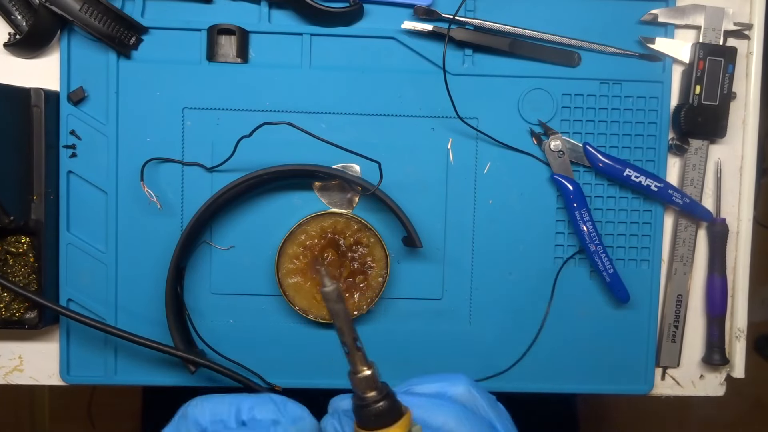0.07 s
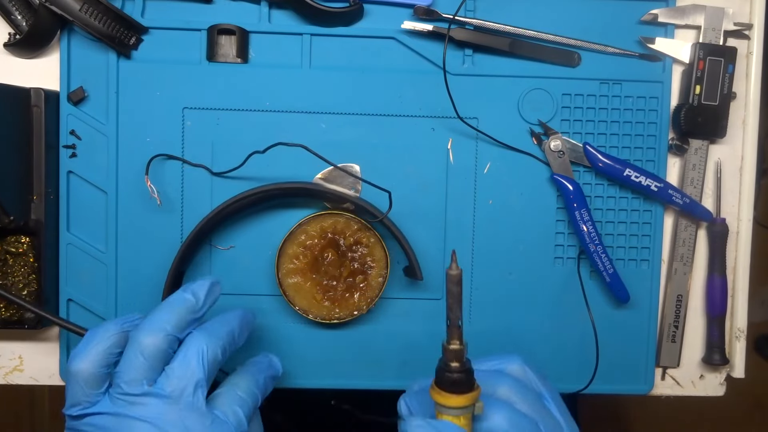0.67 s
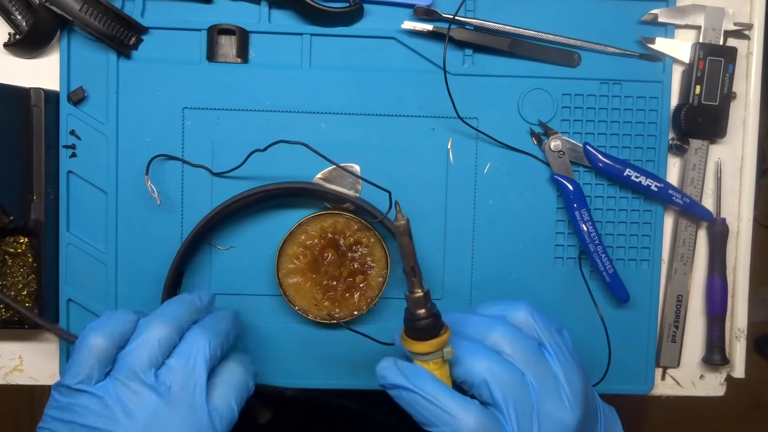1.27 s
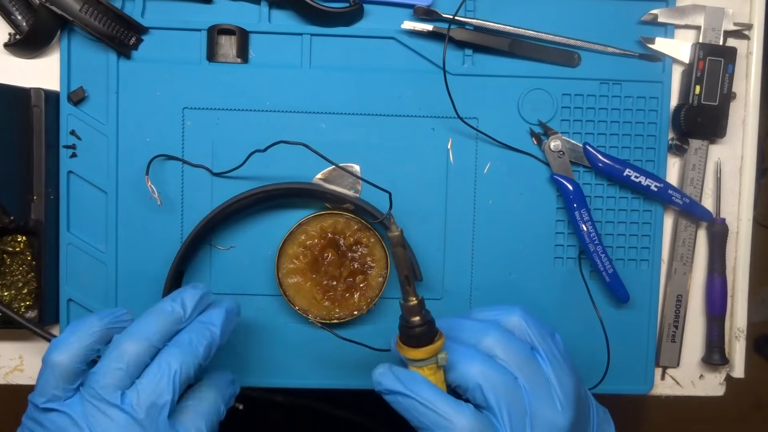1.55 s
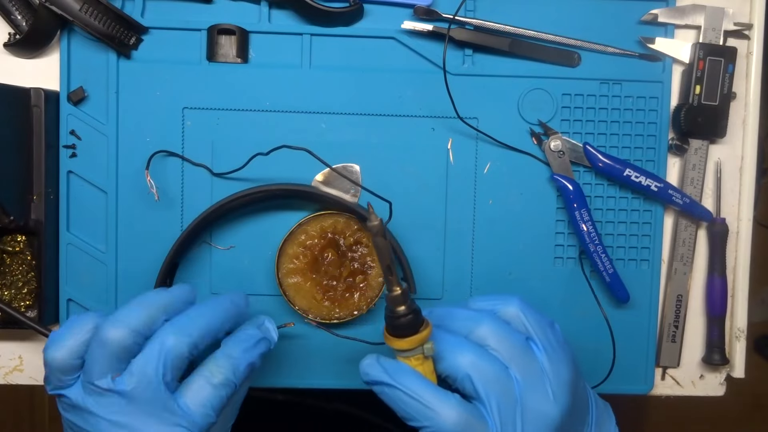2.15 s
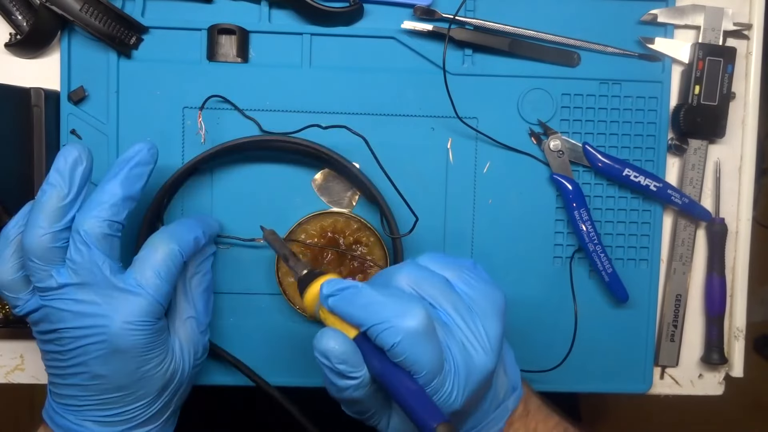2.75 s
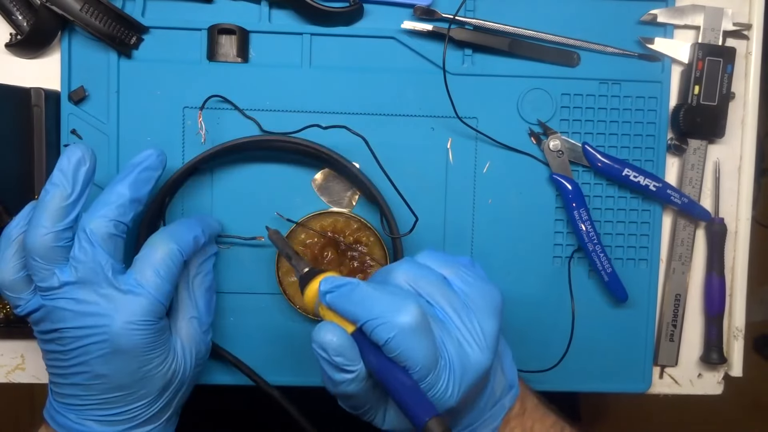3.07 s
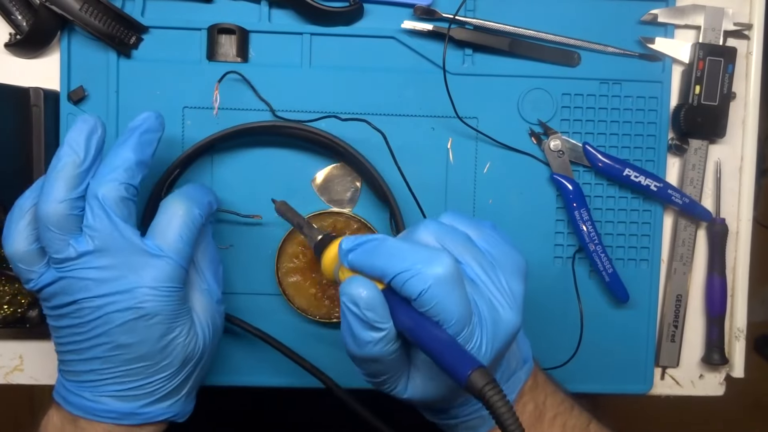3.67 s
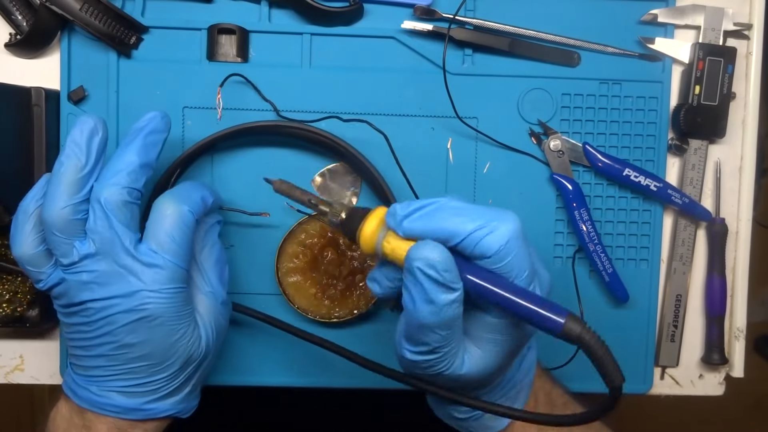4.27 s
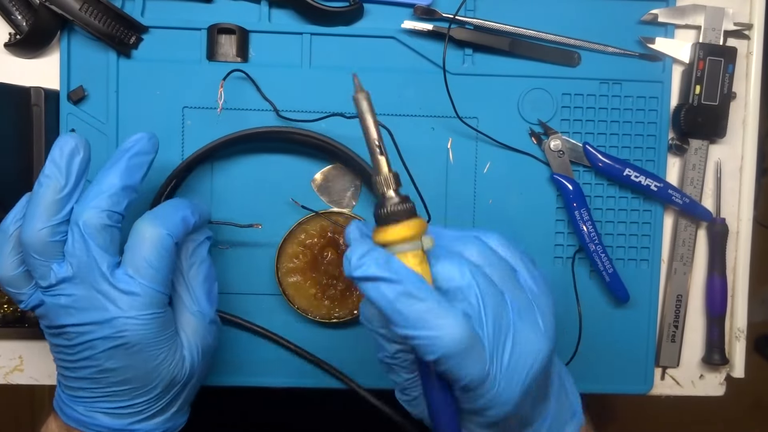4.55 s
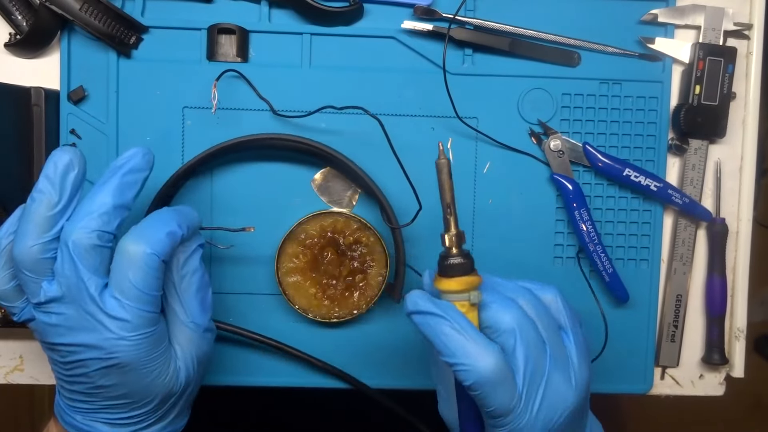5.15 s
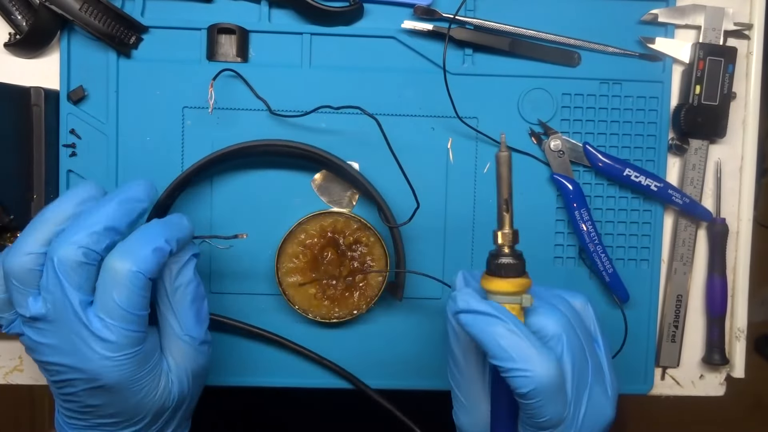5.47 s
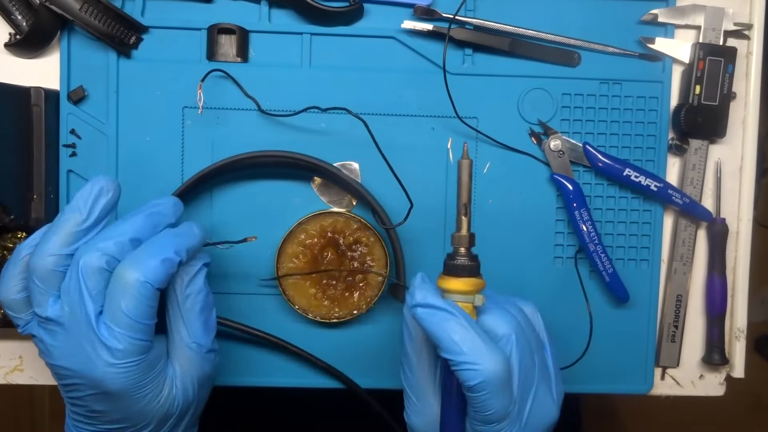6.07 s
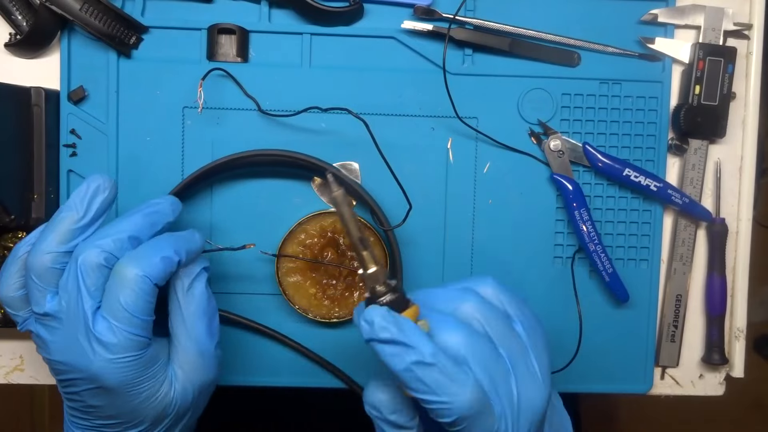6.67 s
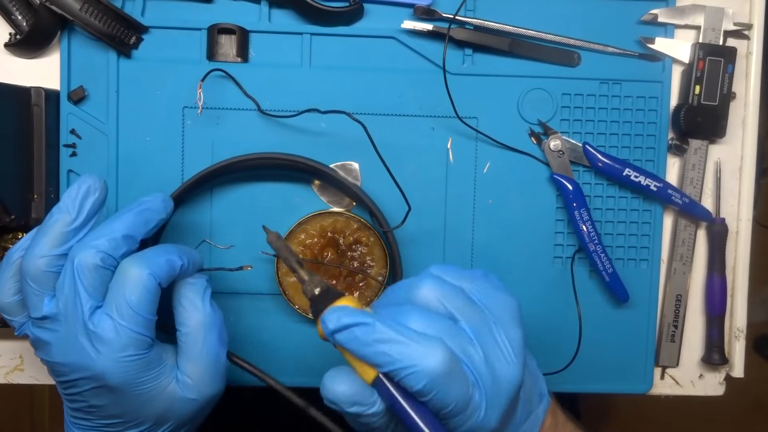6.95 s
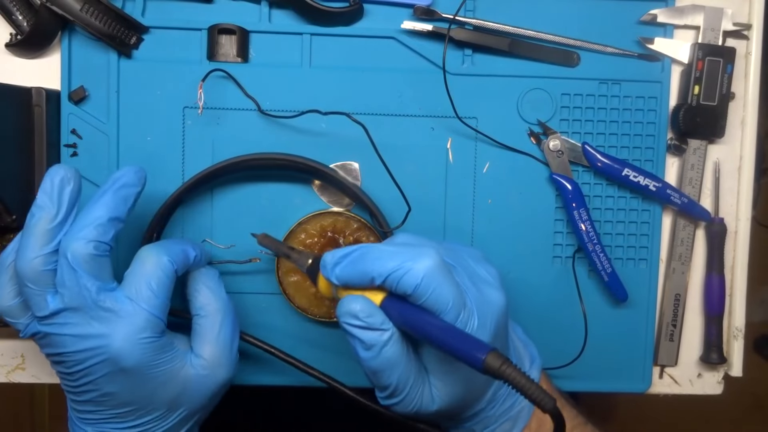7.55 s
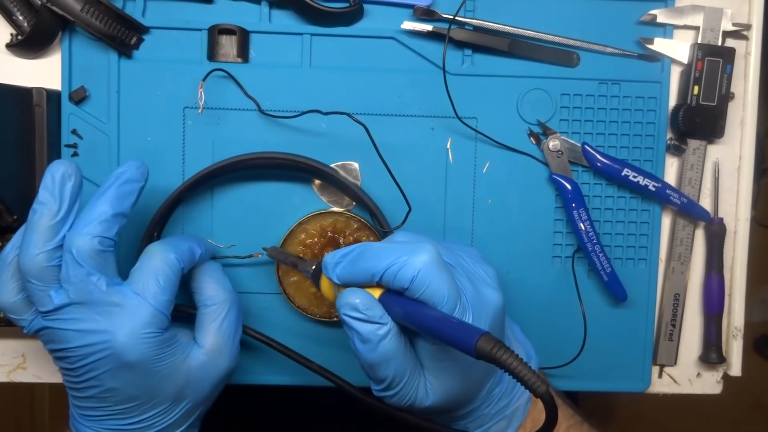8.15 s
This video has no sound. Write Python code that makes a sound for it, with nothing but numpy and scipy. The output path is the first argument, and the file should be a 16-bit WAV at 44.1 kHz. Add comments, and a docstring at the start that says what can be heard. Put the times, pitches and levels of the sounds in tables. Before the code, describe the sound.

Close, quiet soldering work in a small room, over faint hum and microphone hiss. Gloves rub and tick on the iron's handle from the start, while a headband and cable scuff and judder dully over a silicone mat throughout. Soft bumps with small chirps come around 0.5 seconds, and a low ringing thump at 1.5. Near 2 seconds the rubbing grows stronger, with a thin glove whistle. A firm knock at 2.7 briefly rings the bench top and flux tin, followed by lighter knocks until about 4.3. Flux sizzles very faintly at about 3.2 and 3.9. From 4.3 to 6.8 there are mostly glove rubs, sharp little ticks and mat drags, with a short chirp near 4.9. Another firm knock lands at 7 seconds, then two more at 7.4 and 7.9, a trace of sizzle, and a brighter tap at 8.1.

```python
"""Knocks and soft bumps ring a bench top and a flux tin during soldering, some with a low ring or thump.
Gloves rub, tick, chirp and whistle as they slip on the iron's handle. A headband and cable drag and
judder over a silicone mat, and flux sizzles faintly on the hot tip.
A small room answers; its air, a faint hum and microphone hiss lie underneath."""
import sys
import numpy as np
from scipy import signal
from scipy.fft import rfft, irfft, next_fast_len
from scipy.io import wavfile
from scipy.ndimage import uniform_filter1d, map_coordinates

SR = 44100
rng = np.random.default_rng(int(sys.argv[2]) if len(sys.argv) > 2 else 0)


def waveform_to_disk(signal):
    """Save audio, clipped to [-1, 1], as 16-bit WAV at the path in sys.argv[1]."""
    frames = np.transpose(np.atleast_2d(signal))
    scaled = np.clip(frames, -1, 1) * 32767
    samples = np.round(scaled).astype(np.int16)
    wavfile.write(sys.argv[1], SR, samples)


N = 366030


def amp(db):
    """Decibels to gain."""
    return 10 ** (np.asarray(db) / 20)


def unit(x):
    """Scale to rms 1."""
    return x / np.sqrt(np.mean(x ** 2) + 1e-20)


def along(points, hz):
    """Read (freq_hz, value) points on a log axis."""
    freqs_hz, values = np.transpose(points)
    return np.interp(np.log(hz + 1), np.log(freqs_hz + 1), values)


def wobble(rate_hz):
    """Smooth random curve, rate_hz knots a second."""
    knots = rng.standard_normal(int(N * rate_hz / SR) + 4)
    return map_coordinates(knots, [np.arange(N) * rate_hz / SR])


def filtered(x, response):
    """Zero-phase filter with gain response(hz)."""
    n = x.shape[-1]
    size = next_fast_len(n + SR // 4)
    return irfft(rfft(x, size) * response(np.fft.rfftfreq(size, 1 / SR)), size)[..., :n]


def coloured(x, points, size=4096):
    """Minimum-phase filter from (freq_hz, gain_db) points: nothing sounds before an attack."""
    gain = amp(along(points, np.fft.rfftfreq(size, 1 / SR)))
    cepstrum = irfft(np.log(gain))
    cepstrum[1:size // 2] *= 2
    cepstrum[size // 2 + 1:] = 0
    impulse = irfft(np.exp(rfft(cepstrum)))
    return signal.fftconvolve(x, impulse[None], axes=1)[:, :x.shape[1]]


def add(track, start_s, sound):
    """Mix a sound into the track."""
    part = track[:, max(round(start_s * SR), 0):][:, :sound.shape[-1]]
    part += sound[..., :part.shape[1]]


# Stereo width of near sounds: freq_hz, side_over_mid_db
NEAR_WIDTH = [(100, -38), (400, -9), (1000, -11), (4000, -13), (14000, -14)]

def stereo_noise(n, width=NEAR_WIDTH):
    """White noise on two close microphones."""
    mid, side = rng.standard_normal((2, n))
    side = filtered(side, lambda hz: amp(along(width, hz)))
    return np.array([mid + side, mid - side])


def dying_noise(t60s, width, size=128):
    """Half a second of stereo noise, each frequency decaying at its own rate."""
    hz, t, spectrum = signal.stft(stereo_noise(SR // 2, width), SR, nperseg=size)
    decay = amp(-60 * t / along(t60s, hz)[:, None])
    return signal.istft(spectrum * decay, SR, nperseg=size)[1][:, :SR // 2]


def patchy(x, depth_db, size=1024):
    """Moving hands shift the reflections: peaks and dips drift through the spectrum."""
    spectrum = signal.stft(x, nperseg=size)[2]
    field = uniform_filter1d(rng.standard_normal(spectrum.shape[1:]), size=5, axis=0)
    field = uniform_filter1d(field, size=9, axis=1)
    return signal.istft(spectrum * amp(depth_db * unit(field)), nperseg=size)[1][:, :x.shape[1]]


def friction(tone, grain_db, grain_hz):
    """Countless tiny slips of uneven size, coloured by the surface."""
    slips = stereo_noise(N) * amp(grain_db * wobble(grain_hz))
    return unit(coloured(slips, tone))


def stroke(peak_s, length_s, release_ratio=1.21, roundness=1.17):
    """A hand speeds up until peak_s, then slows a little more gently."""
    offset = 2 * (np.arange(N) / SR - peak_s) / length_s
    return np.exp(-np.maximum(-offset, offset / release_ratio) ** roundness)


# Room decay: freq_hz, t60_s
ROOM_DECAY = [(120, 0.86), (500, 0.26), (2000, 0.56), (5000, 0.5), (12000, 0.063)]
# Room stereo width: freq_hz, side_over_mid_db
ROOM_SPREAD = [(60, -25), (200, -10), (700, -3), (2400, -6), (8000, -11)]

def in_room(x, wet_db, build_s=0.0016):
    """Direct sound plus a diffuse small-room tail."""
    t = np.arange(SR // 2) / SR
    tail = dying_noise(ROOM_DECAY, ROOM_SPREAD) * (1 - np.exp(-t / build_s))
    tail /= np.linalg.norm(tail[0])
    return x + amp(wet_db) * signal.fftconvolve(x, tail, axes=1)[:, :x.shape[1]]


# Air and hiss spectrum: freq_hz, gain_db
AIR_SPECTRUM = [(20, -20), (70, -4.5), (113, -5.5), (246, -8.5), (334, -12.5), (634, -19), (1000, -18),
                (1420, -19.5), (2350, -23.5), (4300, -29.5), (5500, -27), (9000, -31), (15600, -34.5)]
# Room hum: pitch_hz, rms_db
HUM_TONES = [(80.7, -73.5), (199.5, -73)]

def room_air(air_db=-60.5):
    """Air noise and microphone hiss, with a slightly unsteady hum."""
    t = np.arange(N) / SR
    hum = sum(np.sqrt(2) * amp(rms_db) * np.sin(2 * np.pi * pitch_hz * t + 0.64 * wobble(3.2))
              for pitch_hz, rms_db in HUM_TONES)
    air = coloured(stereo_noise(N, ROOM_SPREAD), AIR_SPECTRUM)
    return amp(air_db) * unit(patchy(air, depth_db=2.0)) + hum


# Rub and sizzle spectrum: freq_hz, gain_db
HISS_SPECTRUM = [(400, -31), (1000, -6.5), (1850, -1), (2150, -0.5), (2700, 3), (4800, -2.5), (6600, 0),
                 (9400, -4), (10200, 0.5), (11400, -3), (12600, -12.5), (15500, -16)]
# Glove and cable strokes: peak_s, length_s, level_db, tilt_db (added to treble, taken from bass)
RUBS = [(0.027, 0.24, -62.5, 5.5), (0.244, 0.059, -53.5, 6), (0.472, 0.19, -59, -1),
        (0.621, 0.033, -63, 7.5), (1.012, 0.25, -65.5, -0.5), (1.235, 0.12, -58, -2),
        (1.524, 0.28, -63, -2), (1.724, 0.11, -57, -1.5), (1.844, 0.076, -52.5, 5.5),
        (1.975, 0.099, -50, 2.5), (2.103, 0.063, -48.7, 3), (2.212, 0.2, -63, -3),
        (2.333, 0.042, -56, -1.5), (2.522, 0.013, -60, -9), (4.345, 0.13, -57.5, 1.5), (4.53, 0.2, -58, 2),
        (5.03, 0.021, -59.5, -6), (5.381, 0.035, -55.5, -6.5), (5.545, 0.37, -68.5, 2.5),
        (6.578, 0.04, -55, 11.5), (6.658, 0.061, -57.5, 10.5), (6.782, 0.28, -57.5, 0)]

def rub_and_sizzle(resting_db=-75, split_hz=5500):
    """Sliding gloves and cable share one hiss with the flux; each stroke has its level and brightness."""
    gestures = [(amp(level_db) * stroke(peak_s, length_s), tilt_db)
                for peak_s, length_s, level_db, tilt_db in RUBS]
    gestures += flux_boils()
    hiss = patchy(friction(HISS_SPECTRUM, grain_db=2, grain_hz=450), depth_db=3.0)
    hiss *= amp(wobble(22))  # spurts
    treble = filtered(hiss, lambda hz: hz ** 2 / (hz ** 2 + split_hz ** 2))
    resting_power = amp(resting_db) ** 2  # gloves never lie quite still
    treble_power = resting_power + sum((gain * amp(tilt_db)) ** 2 for gain, tilt_db in gestures)
    bass_power = resting_power + sum((gain * amp(-tilt_db)) ** 2 for gain, tilt_db in gestures)
    return treble * np.sqrt(treble_power) + (hiss - treble) * np.sqrt(bass_power)


# Tick spectrum: freq_hz, gain_db
TICK_SPECTRUM = [(500, -5.5), (1500, -1), (2800, 2.5), (6000, 0.5), (10500, -2.5), (13000, -12),
                 (16000, -42)]
# Glove, cable and wire ticks: start_s, level_db (before trim_db), t60_s
TICK_EVENTS = [(0.027, -36, 0.049), (0.2763, -45, 0.025), (0.4473, -34.5, 0.03), (0.4717, -35, 0.049),
               (1.4238, -43, 0.024), (1.4498, -44, 0.015), (1.479, -41, 0.04), (1.4962, -43.5, 0.042),
               (1.677, -44.5, 0.073), (2.5177, -56, 0.017), (2.733, -41.5, 0.035), (3.132, -44.5, 0.017),
               (3.341, -49, 0.031), (3.725, -49.5, 0.13), (4.425, -44, 0.061), (4.6468, -47.5, 0.035),
               (4.941, -38.5, 0.045), (5.4233, -42, 0.037), (5.436, -36.5, 0.031), (6.181, -45, 0.04),
               (6.8132, -39, 0.057), (8.0956, -45.5, 0.045)]

def ticks(trim_db=-8, rise_s=0.00014):
    """A slipping glove or springing wire lets go in a tiny bright burst."""
    track, t = np.zeros((2, N)), np.arange(SR // 8) / SR
    attack = 1 - np.exp(-t / rise_s)
    for start_s, level_db, t60_s in TICK_EVENTS:
        burst = unit(coloured(stereo_noise(len(t)), TICK_SPECTRUM))
        add(track, start_s, burst * attack * amp(level_db + trim_db - 60 * t / t60_s))
    return in_room(patchy(track, depth_db=2.5), wet_db=-20)


# Mat scuff spectrum: freq_hz, gain_db
SCUFF_SPECTRUM = [(40, -9), (80, -26), (150, 2), (250, 2.5), (300, -8), (355, 2.5), (450, -7), (900, -7),
                  (1500, -15), (2500, -18), (4000, -34), (8000, -65)]
# Drags on the mat: peak_s, length_s, level_db
MAT_DRAGS = [(0.255, 0.044, -57.5), (0.56, 0.18, -57), (0.928, 0.089, -58.5), (1.51, 0.077, -53.5),
             (1.756, 0.38, -58), (2.02, 0.25, -54.5), (2.33, 0.04, -56.5), (2.521, 0.03, -54),
             (3.307, 0.26, -55), (4.02, 0.53, -57), (4.27, 0.08, -55.5), (4.53, 0.1, -61),
             (4.902, 0.052, -57.5), (5.438, 0.14, -55.5), (5.597, 0.5, -62.5), (6.81, 0.38, -61.5),
             (7.15, 0.94, -64), (8.12, 0.15, -59.5)]

def mat_drags(resting_db=-69, judder_hz=330, bandwidth_hz=166, judder_equal_db=-53.5):
    """The mat passes a dull scuff to the bench; the firmer the drag, the more the rubber judders."""
    power = sum((amp(level_db) * stroke(peak_s, length_s)) ** 2
                for peak_s, length_s, level_db in MAT_DRAGS)
    drag = np.sqrt(amp(resting_db) ** 2 + power)  # hands lean on the mat throughout
    band = filtered(stereo_noise(N), lambda hz: 1 / (1 + (2 * (hz - judder_hz) / bandwidth_hz) ** 4))
    judder = unit(band) * drag / amp(judder_equal_db)
    scuff = friction(SCUFF_SPECTRUM, grain_db=2.24, grain_hz=90)
    return drag * (scuff + judder)


# Knock bands: edge_hz
BAND_EDGES_HZ = [90, 300, 700, 1400, 2500, 6000]
# Balance of an ordinary knock: freq_hz, band_db
KNOCK_BALANCE = [(165, -5.5), (460, -1), (990, -0.5), (1870, -2.7), (3870, -15)]

def voiced(blow, strength_db, hardness_db_per_oct, ordinary_db=-36.5, brightening_per_oct=0.24):
    """Set a knock's band levels in its first 30 ms; firmer contacts are shorter, so brighter."""
    count = round(0.03 * SR)
    edges_hz = np.array(BAND_EDGES_HZ)
    centres_hz = np.sqrt(edges_hz[1:] * edges_hz[:-1])
    octaves = np.log2(centres_hz / 1000)
    tilt_db_per_oct = brightening_per_oct * (strength_db - ordinary_db) + hardness_db_per_oct
    goal_db = strength_db + along(KNOCK_BALANCE, centres_hz) + tilt_db_per_oct * octaves
    for _ in range(2):
        power = 2 * np.abs(rfft(blow.mean(0)[:count], SR)) ** 2 / (SR * count)  # 1 Hz bins
        band_db = 10 * np.log10(np.add.reduceat(power, edges_hz)[:-1])
        blow = coloured(blow, list(zip(centres_hz, goal_db - band_db)))
    return blow


# Modes of bench and tin: freq_hz, middle_hit_db, rim_hit_db
MODES = [(68, -21, -10.5), (139.7, -10.5, -5.5), (184, -17, -20), (249.8, -9, -11.5), (343.3, -9, -7.5),
         (403, -6, -7.5), (431, -5.5, -6.5), (474, 2, -7.5), (576, -26, 0), (645, -7, -2), (798, -17, 6),
         (933, 2, 5), (1039, -8.5, 14), (1164, 4, -11), (1240, -10, -4), (1297, -1, -3), (1404, -19, -1.5),
         (1565, 0, -3), (1830, 1.5, -13), (2020, 8, -3), (2720, -12, -3.5), (4060, -13, -25)]
# Mode decay: freq_hz, t60_s
MODE_DECAY = [(140, 0.18), (345, 0.22), (480, 0.12), (1000, 0.063), (1560, 0.074), (2000, 0.015),
              (3900, 0.0083)]
# Dense ringing between the modes: freq_hz, gain_db
CLATTER_SPECTRUM = [(30, -28), (70, 4), (130, -2.5), (450, -6), (1100, 7), (2000, -3), (2700, -15),
                    (4000, -28), (6000, -37.5), (11000, -45), (16000, -81)]
# Clatter decay: freq_hz, t60_s
CLATTER_DECAY = [(150, 0.35), (500, 0.32), (1200, 0.045), (2500, 0.074), (6000, 0.061)]
# Clatter stereo width: freq_hz, side_over_mid_db
CLATTER_SPREAD = [(100, -38), (700, -11.5), (4000, -12.5)]
# Knocks and soft bumps on the bench: start_s, strength_db, hardness_db_per_oct, place (0 middle, 1 rim)
BENCH_KNOCKS = [(0.456, -54, 2, 0.96), (0.513, -53.5, -0.4, 0.093), (0.672, -68.5, 0.5, 0.9),
                (1.449, -46, 3.7, 1), (2.436, -67, 1.6, 0.53), (2.7034, -33, 0.3, 0.13),
                (2.834, -41.5, 0.4, 0.55), (3.207, -43, 0.8, 1), (3.74, -41, 0.9, 0.64),
                (3.899, -49, 0.5, 1), (4.14, -46.5, 0.2, 0.94), (4.241, -48, 0, 0.81), (4.423, -56, 0, 0.7),
                (5.501, -64.5, 0, 0.88), (6.781, -69.5, 0, 0.72), (7.0434, -31.5, 0.3, 0.17),
                (7.418, -35.5, -0.1, 0.78), (7.933, -37, 0.2, 0.96), (8.094, -44.5, 9.5, 0.62)]

def bench_knocks(clatter_db=-7, clatter_rise_s=0.0008, scatter_db=4.5, detune=0.0043,
                 yield_s=0.0012, seat_s=0.0039, seat_width_s=0.00061):
    """Each contact rings the modes of bench and tin according to its place, over a brief clatter."""
    track, t = np.zeros((2, N)), np.arange(SR // 2) / SR
    mode_hz, middle_db, rim_db = np.transpose(MODES)[:, :, None]
    signs = (-1) ** np.arange(len(MODES))[:, None]  # neighbouring modes start opposed
    decay = signs * amp(-60 * t / along(MODE_DECAY, mode_hz))
    # the contact yields, then seats on the bench
    seating = 1 + 0.21 * np.exp(-((t - seat_s) / seat_width_s) ** 2)
    swell = (1 - np.exp(-t / yield_s)) * seating
    for start_s, strength_db, hardness_db_per_oct, place in BENCH_KNOCKS:
        scatter, shift = rng.standard_normal((2, len(MODES), 1))
        mode_db = middle_db + place * (rim_db - middle_db) + scatter_db * scatter
        ring = (amp(mode_db) * decay * np.sin(2 * np.pi * mode_hz * (1 + detune * shift) * t)).sum(0)
        clatter = dying_noise(CLATTER_DECAY, CLATTER_SPREAD) * (1 - np.exp(-t / clatter_rise_s))
        clatter = coloured(clatter, CLATTER_SPECTRUM)
        blow = swell * (unit(ring) + amp(clatter_db) * unit(clatter))
        blow = coloured(blow, [(25, 2), (60, -16), (120, 1.5)])  # a small board radiates little bass
        add(track, start_s, voiced(in_room(blow, wet_db=-22.5), strength_db, hardness_db_per_oct))
    return track * amp([[0.35], [-0.35]])  # slightly left


# Short pitched tones: start_s, peak_db, pitch_hz, length_s
SHORT_TONES = [(0.457, -38.5, 357, 0.02), (.514, -37.5, 866, 0.036), (.515, -42.5, 570, 0.031),
               (0.55, -58, 890, 0.033), (0.628, -46.5, 1840, 0.0097), (0.868, -51, 249, 0.087),
               (0.91, -53, 1250, 0.018), (0.911, -55, 1960, 0.012), (1.453, -36, 376, 0.032),
               (1.454, -42.5, 139, 0.028), (4.895, -57.5, 1007, 0.083), (4.9425, -34.5, 1005, 0.0077),
               (6.134, -46.5, 1010, 0.0068), (7.1645, -45, 2320, 0.012)]

def rings_and_chirps(overtone_db=-22, steady_jitter=0.038, onset_jitter=0.12, settle_s=0.0045):
    """Low rings and thumps under the knocks, and small glove chirps; the first cycles are ragged."""
    track, t = np.zeros((2, N)), np.arange(SR // 4) / SR
    depth = steady_jitter + onset_jitter * np.exp(-t / settle_s)
    for start_s, peak_db, pitch_hz, length_s in SHORT_TONES:
        jitter = unit(uniform_filter1d(rng.standard_normal(len(t)), size=24))
        phase = 2 * np.pi * np.cumsum(pitch_hz * (1 + depth * jitter)) / SR
        tone = np.sin(phase) + amp(overtone_db) * np.sin(2 * phase)
        age = 4 * t / length_s
        add(track, start_s, amp(peak_db) * age * np.exp(1 - age) * tone)
    return in_room(track, wet_db=-16)


# Glove whistle contour: time_s, pitch_hz, level_db
WHISTLE_PATH = [(1.89, 3230, -95), (1.93, 3320, -64), (1.97, 3450, -65), (2.01, 3620, -57),
                (2.04, 3560, -57), (2.07, 3430, -63), (2.1, 3400, -95)]

def glove_whistle(jitter=0.013):
    """A sliding glove whistles thinly."""
    t = np.arange(N) / SR
    times_s, pitches_hz, levels_db = np.transpose(WHISTLE_PATH)
    pitch_hz = np.interp(t, times_s, pitches_hz) * (1 + jitter * wobble(700))
    level_db = np.interp(t, times_s, levels_db)
    sounding = level_db > level_db.min() + 1
    return amp(level_db) * np.sin(2 * np.pi * np.cumsum(pitch_hz) / SR) * sounding


# Hot tip touching flux: start_s, level_db
FLUX_TOUCHES = [(3.21, -66.5), (3.9, -72), (7.93, -74)]

def flux_boils(rise_s=0.13, tilt_db=-1):
    """Flux boils up on the hot tip and dies away: one (hiss envelope, tilt_db) per touch."""
    t = np.arange(N) / SR
    boils = []
    for start_s, level_db in FLUX_TOUCHES:
        age = np.maximum(t - start_s, 0) / rise_s
        boils.append((amp(level_db) * age * np.exp(1 - age), tilt_db))
    return boils


def scene():
    """All bench sounds over the room's air."""
    contacts = bench_knocks() + ticks() + rings_and_chirps()
    handling = in_room(glove_whistle() + rub_and_sizzle(), wet_db=-25)
    return contacts + handling + mat_drags() + room_air()


def record(dry, top_hz=15780):
    """Brick-wall low-pass."""
    return filtered(dry, lambda hz: hz < top_hz)


dry = scene()
out = record(dry)
waveform_to_disk(out)
```